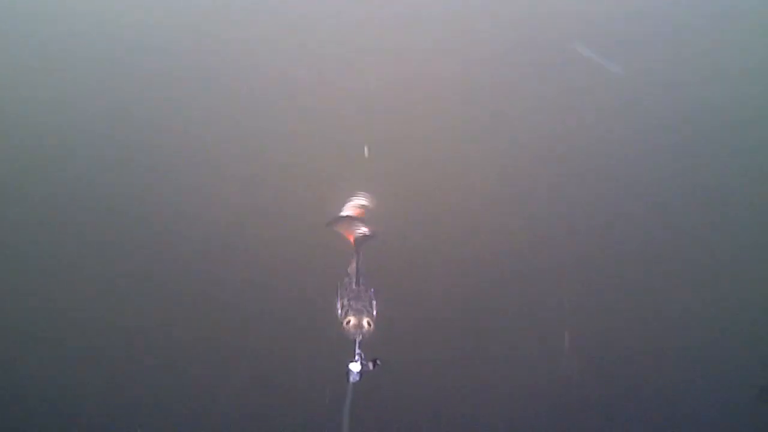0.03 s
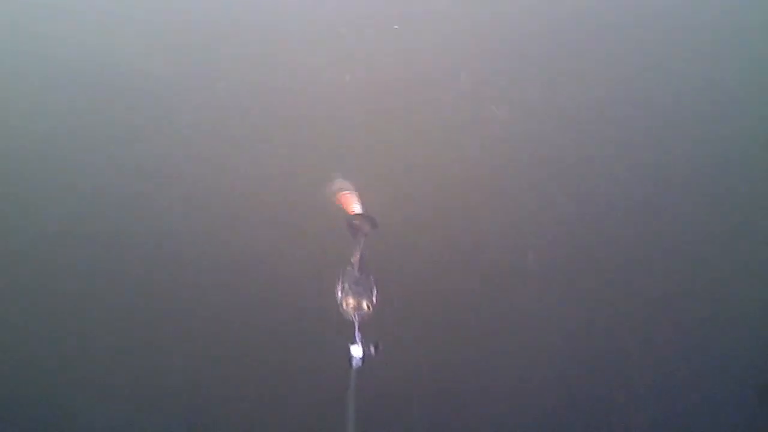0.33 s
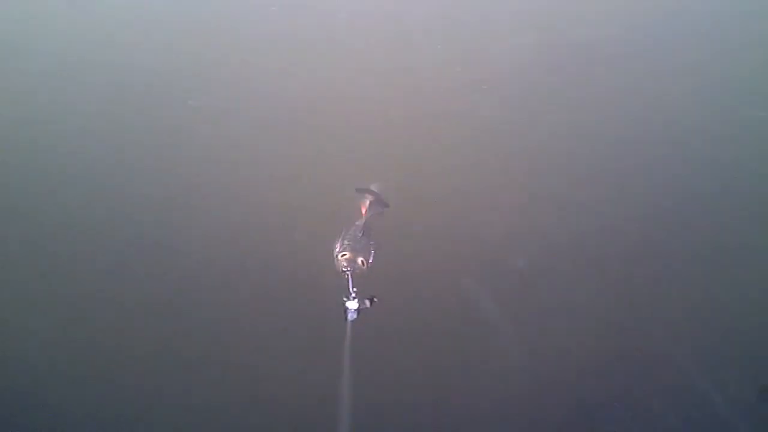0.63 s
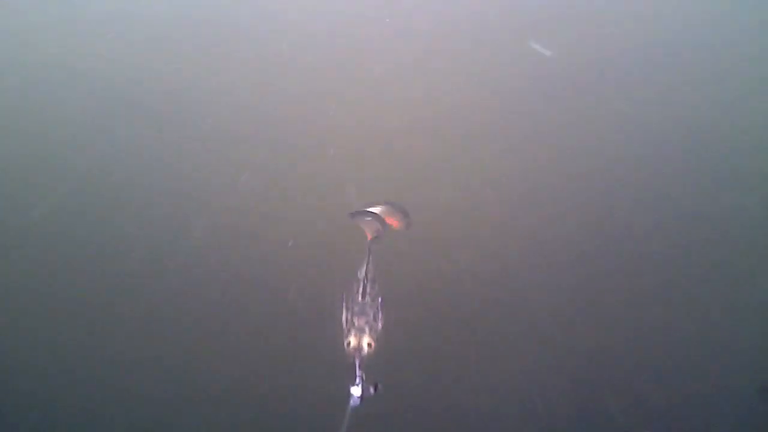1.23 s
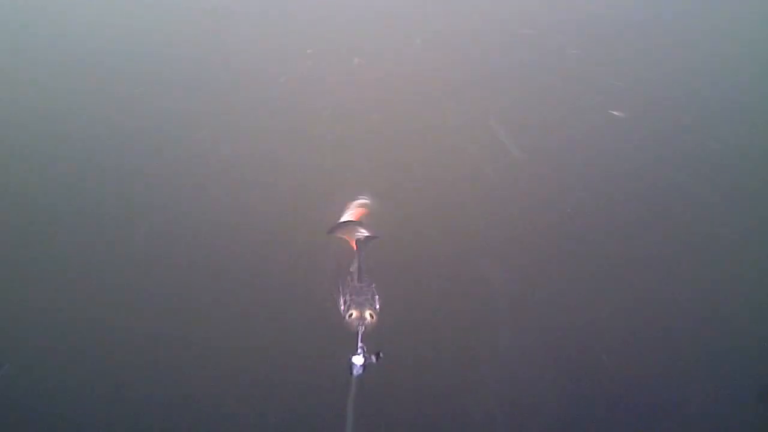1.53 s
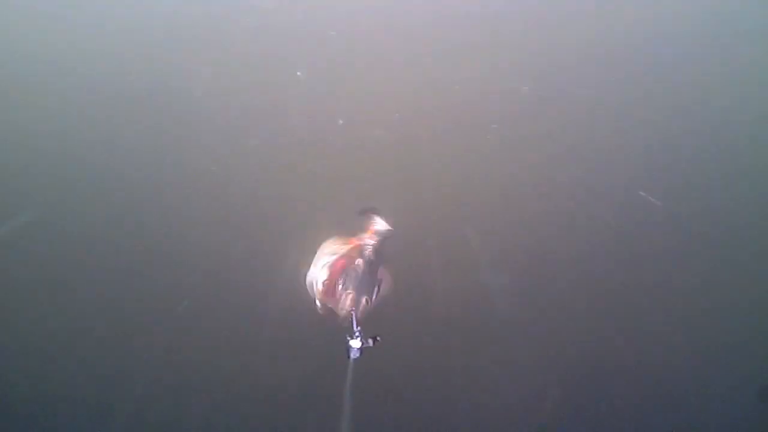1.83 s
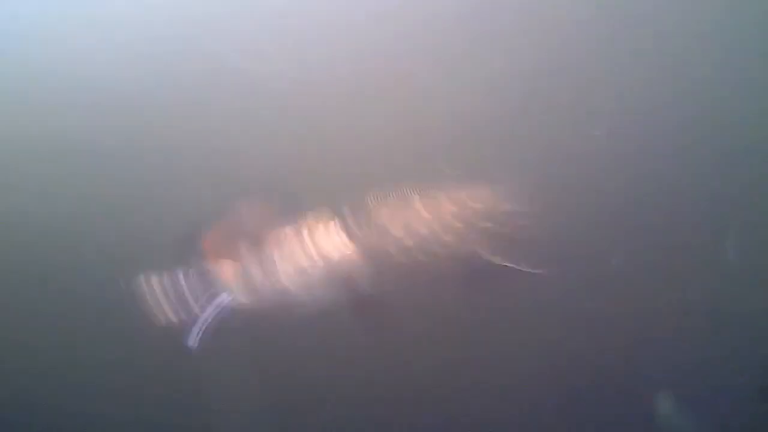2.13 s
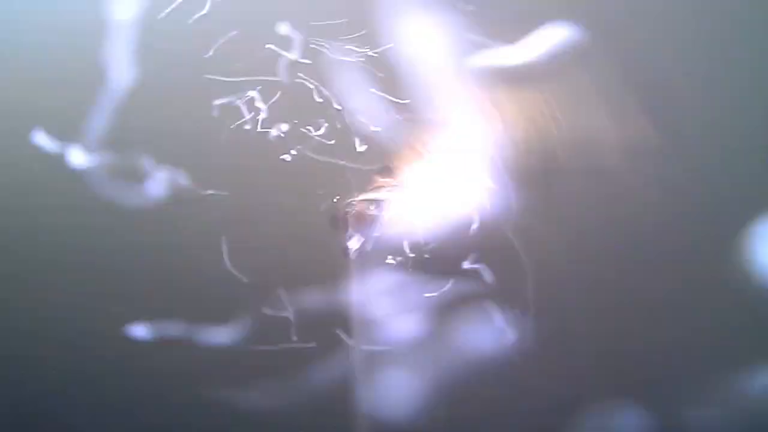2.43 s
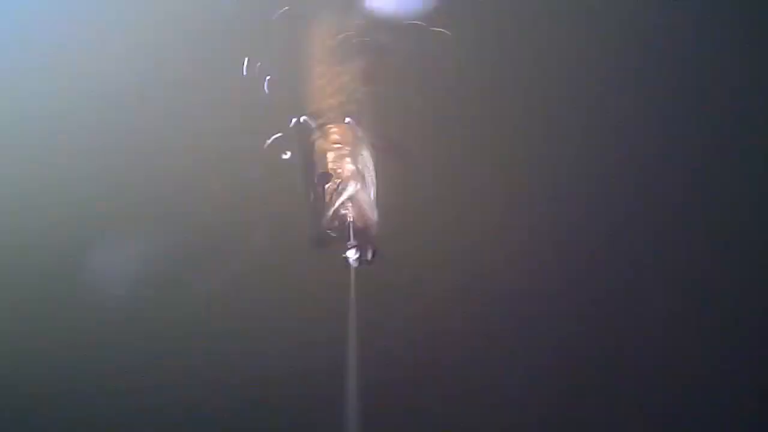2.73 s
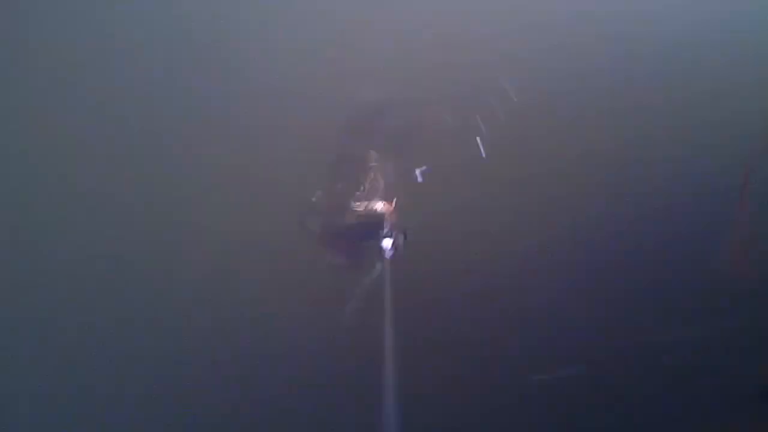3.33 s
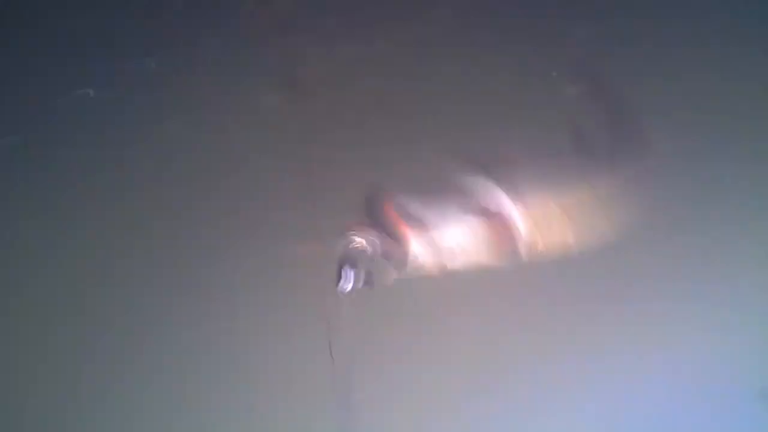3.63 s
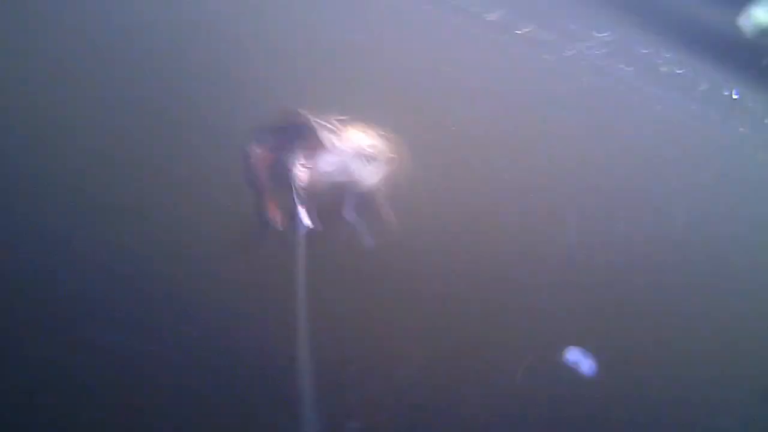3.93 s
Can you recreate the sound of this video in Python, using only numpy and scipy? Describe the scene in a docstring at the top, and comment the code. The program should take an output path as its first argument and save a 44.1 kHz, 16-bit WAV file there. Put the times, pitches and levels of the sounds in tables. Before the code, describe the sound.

Fishing line hums underwater, then rasps and squeals amid sharp knocks as a fish strikes.

```python
"""A fish strikes, heard underwater

A fish takes a lure just behind a small camera towed on the fishing line. The tight line hums
through the camera's housing, then rasps and squeals as the fish pulls. Jerks knock the housing
and overload the microphone. Tail strokes push water against it and leave ticking bubbles."""
import sys
import numpy as np
from scipy import signal
from scipy.fft import rfft, irfft
from scipy.io import wavfile

SR = 44100
rng = np.random.default_rng(int(sys.argv[2]) if len(sys.argv) > 2 else 0)


def store_pcm(level_fs):
    """Save levels as 16-bit WAV."""
    pcm = np.round(np.clip(level_fs, -1, 1) * 32767).astype(np.int16)
    wavfile.write(sys.argv[1], SR, np.atleast_2d(pcm).T)


N = 176400  # 4 seconds
T = np.arange(N) / SR


def from_db(db):
    """Turn decibels into a number to multiply by."""
    return 10 ** (np.asarray(db) / 20)


def rms_one(x):
    """Scale a sound so that its average level (rms) is 1."""
    return x / np.sqrt(np.mean(x ** 2) + 1e-20)


def level(rows):
    """A volume curve through (time_s, level_db) points, silent outside them."""
    time_s, db = np.transpose(rows)
    return from_db(np.interp(T, time_s, db)) * (T >= time_s[0]) * (T <= time_s[-1])


def cut(x, hz, kind="low", order=2):
    """Keep what is below hz ("low") or above it ("high")."""
    return signal.sosfilt(signal.butter(order, hz, kind, fs=SR, output="sos"), x + 1e-18)


def drift(hz):
    """A random wobble of typical size 1, mostly slower than hz."""
    return rms_one(cut(rng.standard_normal(N), hz))


def flutter(depth_db, rate_hz):
    """A volume that wavers at random, at most depth_db up or down."""
    return from_db(depth_db * np.tanh(drift(rate_hz)))


def ring(x, hz, ring_s):
    """Each click in x starts a tone that fades by 60 dB in ring_s."""
    decay, angle = np.exp(-np.log(1000) / (ring_s * SR)), 2 * np.pi * hz / SR
    return signal.lfilter([0, np.sin(angle)], [1, -2 * decay * np.cos(angle), decay ** 2], x + 1e-18)


def noise_band(hz, width_hz):
    """Noise gathered around one pitch, at level 1."""
    b, a = signal.iirpeak(hz, hz / (2 * width_hz), fs=SR)
    return rms_one(signal.lfilter(b, a, signal.lfilter(b, a, rng.standard_normal(N))))


def noise_bands(rows):
    """Mix one noise band for each (pitch_hz, width_hz, level_db) row."""
    return sum(from_db(db) * noise_band(hz, width_hz) for hz, width_hz, db in rows)


def add(out, start_s, sound):
    """Mix a short sound in at start_s."""
    i = int(start_s * SR)
    out[i:i + len(sound)] += sound[:max(N - i, 0)]


# Faint steady whines: pitch_hz, width_hz, level_db
WHINE_BANDS = [(5100, 190, -76.5), (7850, 250, -80.5)]
# The tone of the hiss, low to high: pitch_hz, relative_db
HISS_TONE = [(100, -18.5), (300, -15.5), (700, 4), (1500, 5), (3000, -4.5), (6000, -6.5), (10000, -9),
             (16000, -12)]


def hiss(level_db=-60):
    """The microphone makes a steady hiss, with two faint whines."""
    whine = noise_bands(WHINE_BANDS)
    hz, db = np.transpose(HISS_TONE)
    log_hz = np.log(np.fft.rfftfreq(N, 1 / SR) + 1)
    tone = from_db(np.interp(log_hz, np.log(hz), db))
    noise = irfft(rfft(rng.standard_normal(N)) * tone, N)
    return whine + from_db(level_db) * rms_one(noise)


# Water churning around the housing: time_s, level_db
SWIRL_LEVELS = [(0, -58), (1.85, -57.5), (1.925, -42.5), (1.96, -62.5), (2.16, -48), (2.235, -34.5),
                (2.27, 0), (2.32, -42), (2.45, -50), (2.55, -53.5), (2.74, -54), (2.81, -40.5), (2.87, -47),
                (2.96, -28.5), (3.06, -40), (3.22, -54.5), (3.32, -43), (3.42, -47), (3.5, -38.5), (4, -43)]
# Pushes of water on the housing: start_s, level_db, pitch_hz, ring_s
TAIL_THUMPS = [(2.238, -7.5, 68, 0.028), (2.252, 7, 45.8, 0.14), (2.268, 1, 150.7, 0.037),
               (2.269, -5.5, 85.7, 0.042), (2.276, 6.5, 26.1, 0.099), (2.801, -21, 40, 0.11),
               (2.937, -6.5, 45, 0.041), (2.982, -11, 22, .1), (3.303, -24.5, 51, 0.18),
               (3.484, -16.5, 43.2, 0.19), (3.645, -22, 28.1, 0.19), (3.871, -18.5, 27, 0.089),
               (3.924, -16.5, 27, 0.086)]


def water():
    """Tail strokes thump the housing over the low rumble of swirling water."""
    rumble = cut(rng.standard_normal(N), 45, order=1)
    swirl = cut(cut(rumble, 500), 22, "high")
    out, t = level(SWIRL_LEVELS) * rms_one(swirl), T[:SR // 4]
    for start_s, db, hz, ring_s in TAIL_THUMPS:
        fade = np.exp(-np.log(1000) * t / ring_s)
        add(out, start_s, from_db(db) * np.sin(2 * np.pi * hz * t) * fade)
    return out


# How loudly the water fizzes: time_s, level_db
FIZZ_LEVELS = [(1.88, -73), (1.91, -60), (1.928, -37), (1.945, -49), (2.0, -67), (2.12, -60), (2.172, -44),
               (2.19, -58), (2.24, -54), (2.251, -3.5), (2.28, -27), (2.3, -35.5), (2.35, -26.5),
               (2.42, -52), (2.46, -58), (2.6, -63.5), (2.625, -35.5), (2.65, -58), (2.79, -78.5),
               (2.812, -27.5), (2.83, -59.5), (2.9, -64), (2.93, -40), (3.0, -41.5), (3.07, -58),
               (3.2, -82), (3.31, -61), (3.4, -79), (3.52, -48), (3.72, -56.5), (3.85, -40), (3.93, -79),
               (3.97, -38.5), (4, -78)]
# How strong the tiny bubbles are at each pitch: pitch_hz, relative_db
FIZZ_TONE = [(2400, -10), (3300, 9.5), (4300, -7), (5400, 6.5), (6400, -6.5), (7700, 7), (9200, -23),
             (11000, -22), (14500, -20.5)]


def fizz(bubbles_per_s=1100, spread_db=3.5, ring_cycles=23, pitch_count=24):
    """Clouds of tiny bubbles ring, each with a random strength and pitch."""
    strengths = from_db(spread_db * np.minimum(rng.exponential(1, N), 3)) * rng.choice([-1, 1], N)
    clicks = strengths * (rng.random(N) < bubbles_per_s / SR)
    tone_hz, tone_db = np.transpose(FIZZ_TONE)
    chosen_pitch = rng.integers(0, pitch_count, N)
    cloud = np.zeros(N)
    for k, hz in enumerate(np.geomspace(tone_hz[0], tone_hz[-1], pitch_count)):
        gain = from_db(np.interp(hz, tone_hz, tone_db))
        cloud += gain * ring(clicks * (chosen_pitch == k), hz, ring_cycles / hz)
    cloud = cut(cloud, tone_hz[0], "high", order=1)
    return level(FIZZ_LEVELS) * rms_one(cut(cloud, 10000, order=4))


# Single ticking bubbles: start_s, peak_db, pitch_hz
BUBBLE_TICKS = [(1.093, -41.5, 4160), (1.9275, -28.5, 5200), (1.931, -27, 7800), (1.954, -36, 5000),
                (2.1702, -24.5, 7700), (2.3102, -22, 3900), (2.319, -16, 3300), (2.336, -23.5, 6700),
                (2.3496, -6.5, 3300), (2.353, -36, 7700), (2.3607, -25, 7500), (2.366, -35, 5400),
                (2.3733, -27, 5500), (2.381, -21, 3300), (2.3875, -23, 3100), (2.403, -32, 8000),
                (2.4146, -26, 7500), (2.4868, -33.5, 7350), (2.488, -34, 3000), (2.5418, -28, 2900),
                (2.5906, -42.5, 2100), (2.612, -31, 7500), (2.6199, -31.5, 5000), (2.623, -26, 3000),
                (2.6329, -31.5, 4500), (2.657, -41.5, 2200), (2.8034, -48, 3000), (2.8129, -34, 4000),
                (2.9047, -31, 4500), (2.976, -33, 3130), (2.992, -22, 2970), (2.998, -15.5, 5550),
                (3.0416, -16.5, 4700), (3.0508, -26.5, 5000), (3.0552, -26.5, 3700), (3.313, -39, 4900),
                (3.549, -27, 5200), (3.826, -25.5, 5300), (3.84, -23, 5600), (3.8508, -21, 4000),
                (3.9635, -23, 3300), (3.9772, -28, 3400), (3.977, -30, 7700)]


def bubbles(ring_cycles=34, pitch_rise=0.036, snap_s=0.0014, snap_db=-6, fade_in_s=0.00025):
    """Each bubble breaks free with a snap and rings briefly with rising pitch."""
    out, t = np.zeros(N), T[:SR // 30]
    for start_s, db, hz in BUBBLE_TICKS:
        age = t * hz / ring_cycles  # reaches 1 when the tone has faded by 60 dB
        tone = np.sin(2 * np.pi * hz * t * (1 + pitch_rise * age)) * np.exp(-np.log(1000) * age)
        snap = cut(rng.standard_normal(len(t)) * np.exp(-t / snap_s), hz / 2, "high")
        snap = cut(snap, 8300, order=3)  # the housing wall dulls the snap
        tick = (tone + from_db(snap_db) * snap) * (1 - np.exp(-t / fade_in_s))
        add(out, start_s, from_db(db) * tick / np.abs(tick).max())
    return out


# The fish bumping the tackle: start_s, level_db, pitch_hz
SOFT_BUMPS = [(1.9215, -36.5, 235), (1.934, -47, 500), (2.2053, -23.5, 537), (2.2119, -31, 560),
              (2.2395, -19.5, 400), (2.7559, -44.5, 600), (2.801, -39, 463), (2.815, -37, 590),
              (2.931, 0.5, 560), (2.958, -41, 550), (2.983, -22.5, 533), (3.0155, -11, 240),
              (3.078, -29, 890), (3.171, -31, 540), (3.548, -25.5, 570), (3.858, -10.5, 500),
              (3.957, -30, 585)]


def bumps(rise_s=0.0018, grit_db=-0.5, grit_top_hz=1170):
    """A soft touch makes a gritty tone that swells and dies within a few cycles."""
    out, t = np.zeros(N), T[:SR // 25]
    swell = t / rise_s * np.exp(1 - t / rise_s)
    for start_s, db, hz in SOFT_BUMPS:
        grit = from_db(grit_db) * rms_one(cut(rng.standard_normal(len(t)), grit_top_hz))
        add(out, start_s, from_db(db) * swell * (np.sin(2 * np.pi * hz * t) + grit))
    return out


# Knocks on the housing, soft ticks while towed and hard jerks from the fish (harder is brighter): start_s,
# relative_db, chatter_s, hardness_hz
HOUSING_KNOCKS = [(.0243, -32, 0.00033, 1800), (.7305, -25.5, 0.0014, 1900), (0.7817, -26.5, 0.00046, 1710),
                  (0.883, -23.5, 0.0013, 1760), (.918, -25.5, 0.0018, 1680), (0.961, -30.5, 0.00086, 1690),
                  (1.1578, -36, .001, 5000), (1.526, -24, .001, 1930), (1.8913, -25.5, 0.003, 1700),
                  (1.916, -25.5, 0.00066, 1970), (2.1971, -18.5, .002, 6000), (2.252, 18, 0.0026, 9000),
                  (2.269, 21, 0.006, 4050), (2.2781, 12.5, 0.0061, 9000), (2.2874, 23.5, 0.0025, 6000),
                  (2.8005, -27, 0.006, 3000), (2.903, -22.5, 0.00065, 7160), (2.927, 2.5, 0.00057, 2990),
                  (2.931, 15.5, 0.0016, 4960), (2.9449, -7, 0.0013, 5120), (3.0156, 14, 0.00093, 6800),
                  (3.4694, 13, 0.0011, 6900), (3.515, -11.5, 0.0015, 6900), (3.5864, 2, 0.00033, 3920),
                  (3.6191, 23, 0.0013, 6300), (3.736, -8, 0.00041, 3780), (3.8565, 18.5, 0.0023, 7700),
                  (3.9109, 15.5, 0.0018, 5960)]
# The notes of the struck housing: pitch_hz, relative_db, ring_s
HOUSING_NOTES = [(400, -27, 0.014), (601.5, -19, 0.021), (861, -14.5, 0.0086), (1257, -8.5, 0.0079),
                 (1656.5, -6.5, 0.013), (1920, -1.5, .011), (2250, -8, 0.0077), (2792, -9, 0.0062),
                 (3401, -22, 0.018), (5200, -26.5, 0.003), (7700, -19.5, 0.0069)]


def knocks(chatter_db=-18.5, boost_db=0.5, crack_db=-4, crack_low_hz=694, crack_top_hz=4300):
    """Each knock is a click and a dying chatter that set the housing ringing."""
    force, t = np.zeros(N), T[:SR // 20]
    for start_s, db, chatter_s, hardness_hz in HOUSING_KNOCKS:
        blow = from_db(chatter_db) * rng.standard_normal(len(t)) * np.exp(-t / chatter_s)
        blow[0] = 1  # the click
        add(force, start_s, from_db(db + boost_db) * cut(blow, hardness_hz))
    # The blows also reach the microphone directly, as a crack.
    crack = cut(cut(force, crack_low_hz, "high", order=1), crack_top_hz)
    crack *= from_db(crack_db) * SR / (2 * crack_top_hz)
    notes = sum((-1) ** k * from_db(db) * ring(force, hz, ring_s)
                for k, (hz, db, ring_s) in enumerate(HOUSING_NOTES))
    return crack + notes


# Pitches that the running line stirs up: pitch_hz, width_hz, relative_db
RUB_BANDS = [(560, 70, -4), (850, 220, -9), (1250, 180, -9.5), (1686, 170, 4.5), (1900, 220, -18),
             (2196, 340, 2), (2556, 120, -7), (3500, 200, -9), (5260, 130, -20), (6850, 320, -20.5),
             (7600, 180, -25), (9900, 500, -35)]
# The line rubbing as it is towed: time_s, level_db
TOW_LEVELS = [(0, -54), (.3, -52.5), (.45, -51.5), (.68, -57), (.95, -53.5), (1.25, -56.5), (1.6, -56.5),
              (1.9, -57.5), (2.1, -57.5), (2.47, -54), (2.55, -66), (2.75, -88.5), (3.22, -66.5),
              (3.32, -47), (3.4, -77), (4, -60)]
# The fish dragging the line, one curve for each pull: time_s, level_db
PULL_LEVELS = [
    [(2.12, -54), (2.19, -46), (2.245, -40), (2.31, -34.5), (2.36, -35.5), (2.41, -27), (2.45, -55)],
    [(2.9, -53), (2.925, -24), (2.965, -33.5), (2.995, -21.5), (3.035, -56.5), (3.06, -44), (3.09, -31),
     (3.13, -36.5), (3.175, -34.5), (3.19, -56)],
    [(3.39, -61), (3.43, -41.5), (3.465, -37), (3.52, -30.5), (3.57, -35.5), (3.605, -37), (3.64, -28.5),
     (3.655, -37), (3.73, -35.5), (3.75, -32.5), (3.77, -44), (3.83, -26.5), (3.88, -49), (3.93, -44.5),
     (3.985, -53), (4, -32)],
]
# The line strumming in the current: time_s, level_db
STRUM_LEVELS = [(0, -65), (.28, -82), (.38, -59), (.6, -59.5), (.92, -56.5), (1.03, -69), (2.1, -65),
                (3.4, -60.5), (3.6, -40), (3.635, -27.5), (3.665, -64), (3.715, -30.5), (3.755, -45.5),
                (3.8, -40), (3.835, -34), (3.88, -39.5), (4, -47)]


def fishing_line(tow_top_hz=2255, strum_hz=555):
    """The line hums in the current and rubs: dull while towed, bright and rough when pulled."""
    rub = rms_one(noise_bands(RUB_BANDS))
    tow = level(TOW_LEVELS) * rms_one(cut(rub, tow_top_hz))
    rasp = sum(level(pull) for pull in PULL_LEVELS) * rub * flutter(depth_db=7.8, rate_hz=150)
    hum = noise_band(strum_hz, width_hz=35) * flutter(depth_db=2.5, rate_hz=40)
    return tow + rasp + level(STRUM_LEVELS) * hum


# Pitches that the slipping line rings in the housing: pitch_hz, width_hz, relative_db
SLIP_BANDS = [(2300, 290, 4), (3830, 160, -10), (4850, 100, -21), (6760, 350, -22.5), (7180, 130, -17.5),
              (11000, 200, -37.5), (14260, 300, -23.5)]
# The line squealing, one curve for each squeal: time_s, pitch_hz, level_db
SQUEAL_CURVES = [
    [(2.21, 1500, -43), (2.23, 1750, -35), (2.238, 1800, -39)],
    [(3.08, 1900, -30), (3.097, 1774, -24), (3.106, 2150, -32), (3.123, 2262, -17), (3.136, 2200, -28.5),
     (3.148, 1920, -17), (3.162, 1756, -35.5), (3.178, 1730, -33)],
    [(3.594, 1650, -28), (3.603, 1901, -18.5), (3.612, 2250, -22.5), (3.64, 2300, -28.5),
     (3.655, 2180, -40), (3.667, 2120, -30), (3.677, 1820, -18), (3.688, 1660, -25.5)],
    [(3.756, 1593, -27), (3.764, 1817, -14.5), (3.771, 1900, -22), (3.793, 1812, -25), (3.803, 2040, -21),
     (3.817, 1860, -16), (3.82, 1770, -13), (3.829, 1850, -12.5), (3.84, 1760, -36)],
    [(3.992, 1900, -50), (3.996, 2034, -34), (4, 2200, -19.5)],
]


def squeals(pitch_wobble=0.044, flutter_hz=120.9, rasp_db=-20.5):
    """The line sticks and slips, making a raspy tone that rises and falls with the tension."""
    out = np.zeros(N)
    wobble = 1 + pitch_wobble * drift(2 * flutter_hz)
    waver = flutter(depth_db=4.5, rate_hz=flutter_hz)
    slip_noise = from_db(rasp_db) * rms_one(noise_bands(SLIP_BANDS))
    for curve in SQUEAL_CURVES:
        time_s, hz, db = np.transpose(curve)
        on = (T >= time_s[0]) & (T <= time_s[-1])
        phase = 2 * np.pi * np.cumsum(np.interp(T[on], time_s, hz) * wobble[on]) / SR
        gain = from_db(np.interp(T[on], time_s, db)) * waver[on]
        tone = np.sqrt(2) * gain * np.sin(phase)
        rasp = gain ** 0.68 * slip_noise[on]  # swells and fades less than the tone
        out[on] += (tone + rasp) * signal.windows.tukey(len(phase), 0.08)
    return out


def scene():
    """Everything reaches one microphone inside the housing."""
    return (knocks() + bumps() + fishing_line() + squeals() + water() + bubbles() + fizz() + hiss())[None]


def record(dry):
    """The microphone overloads, flattening the loudest peaks; the highest treble is cut."""
    ceiling, hardness, top_hz = 0.92, 15, 16000
    clipped = ceiling * dry / (1 + np.abs(dry) ** hardness) ** (1 / hardness)
    return signal.sosfilt(signal.ellip(10, 0.1, 70, top_hz, fs=SR, output="sos"), clipped)


dry = scene()
out = record(dry)
store_pcm(out)
```